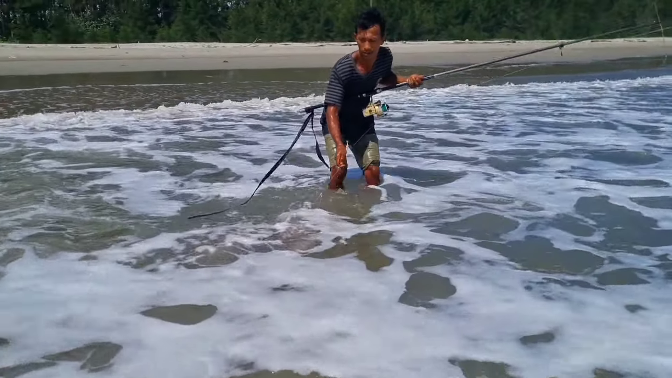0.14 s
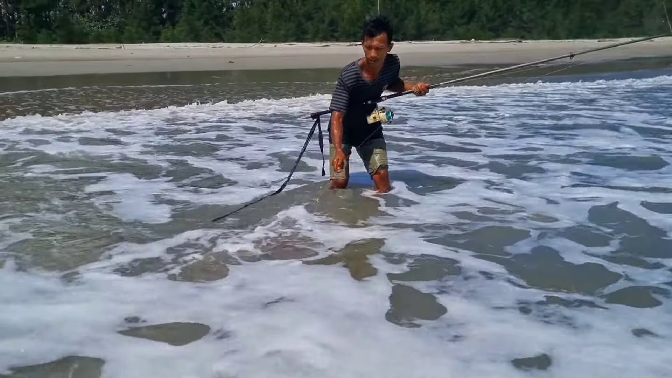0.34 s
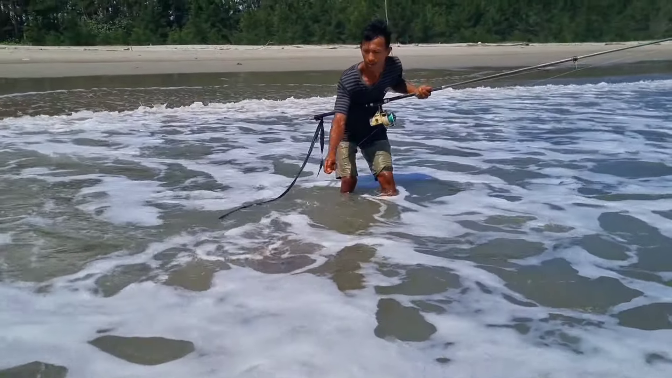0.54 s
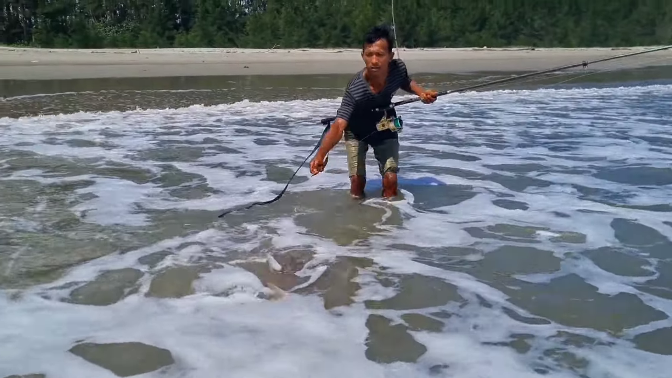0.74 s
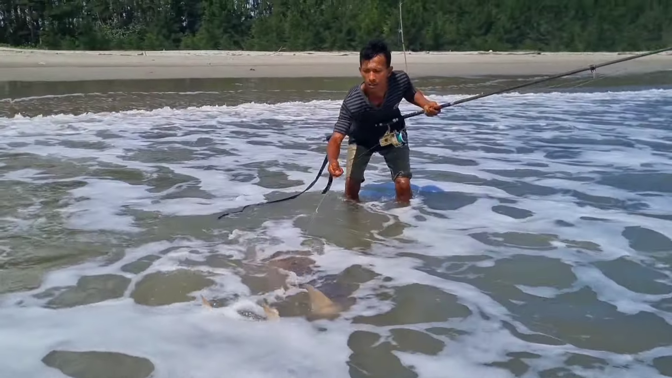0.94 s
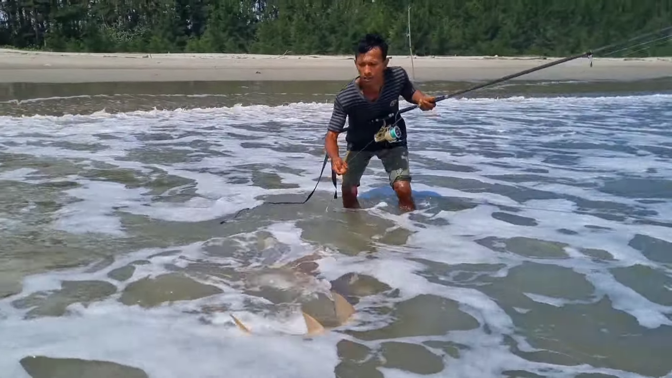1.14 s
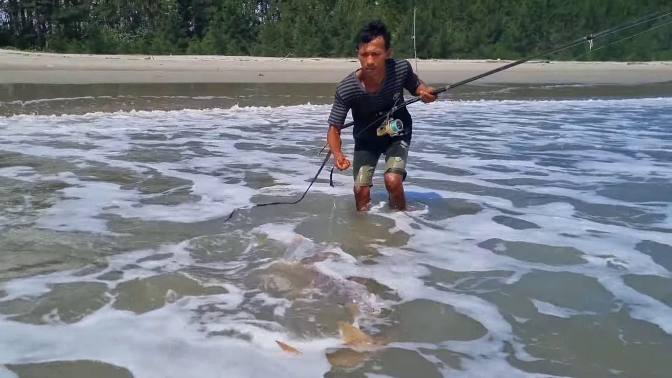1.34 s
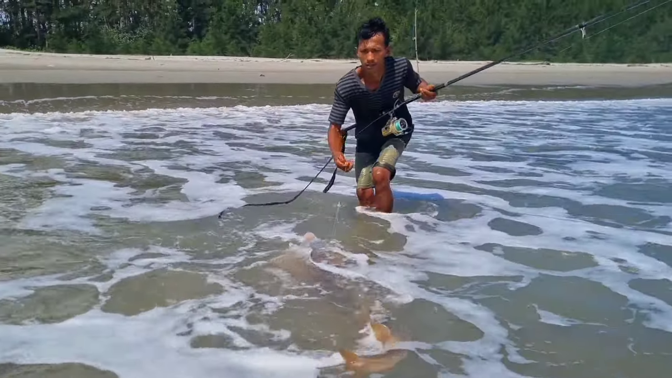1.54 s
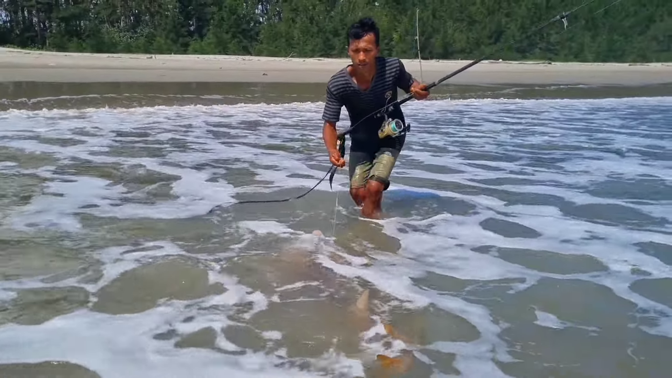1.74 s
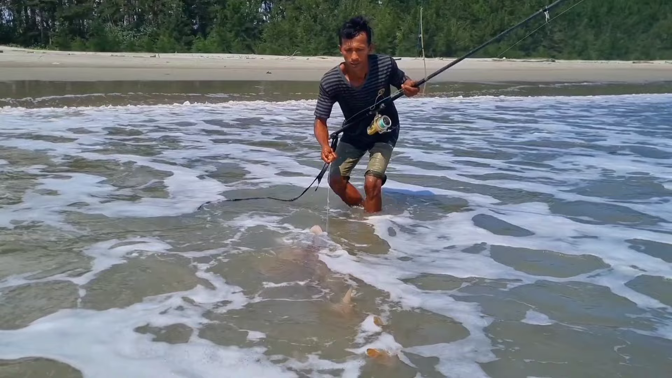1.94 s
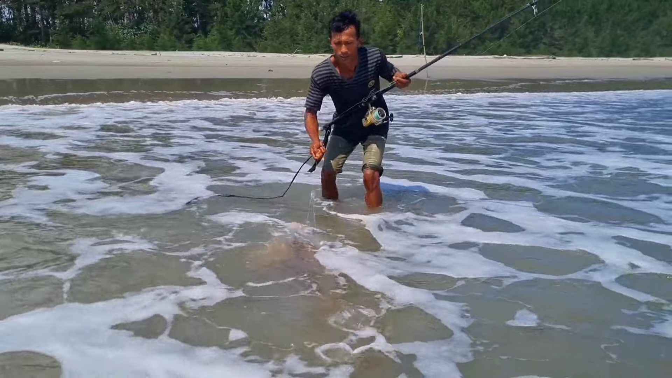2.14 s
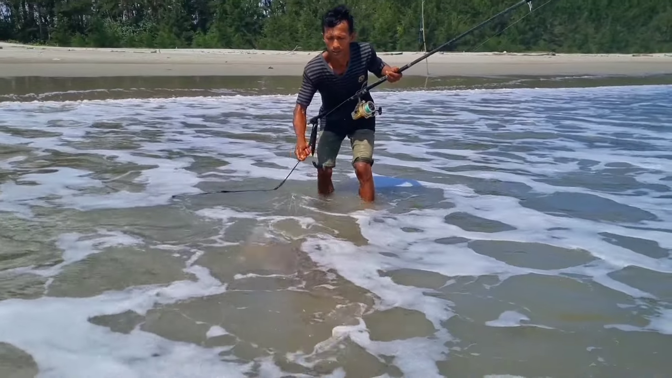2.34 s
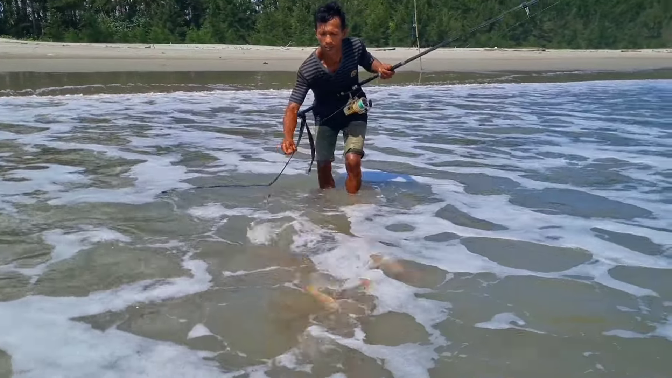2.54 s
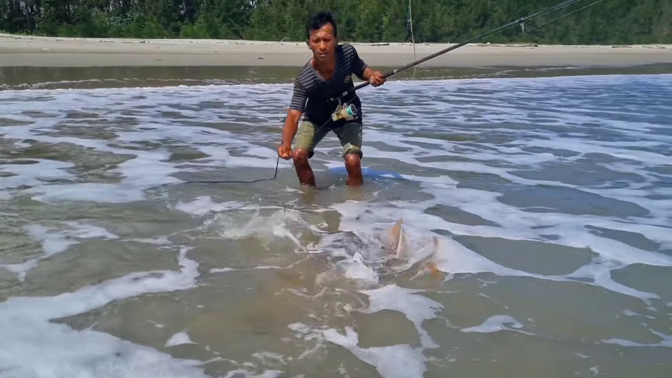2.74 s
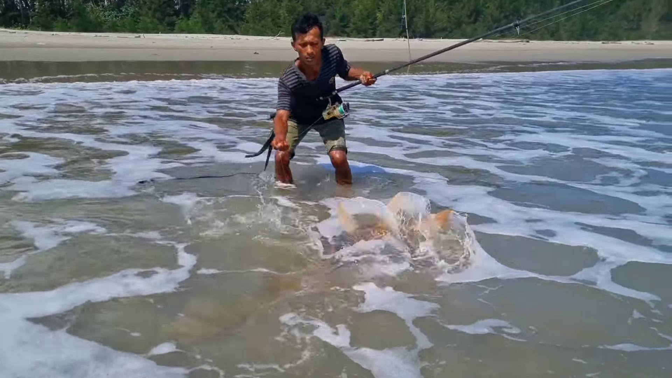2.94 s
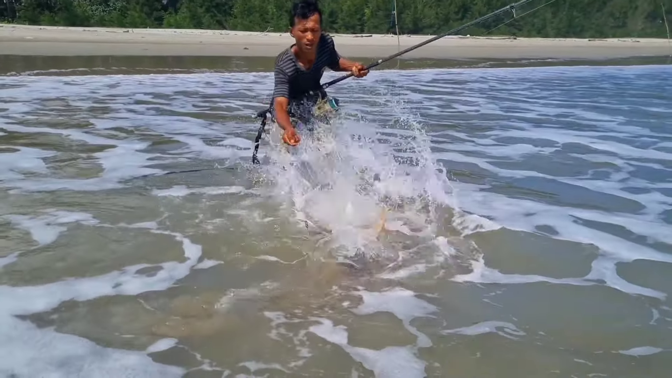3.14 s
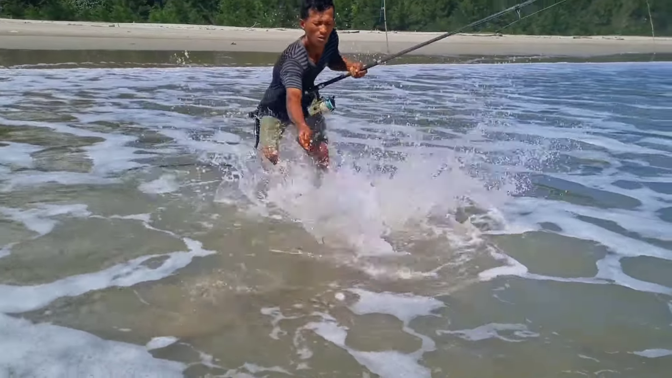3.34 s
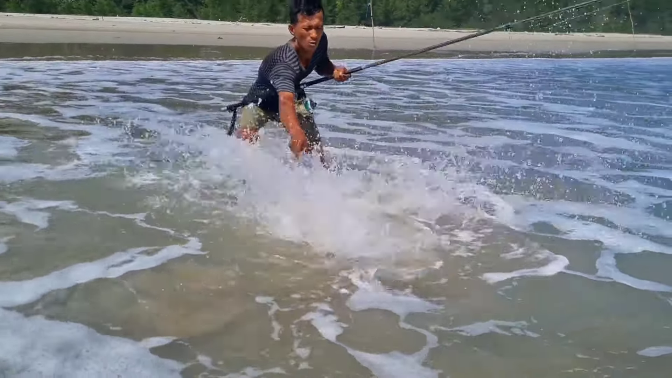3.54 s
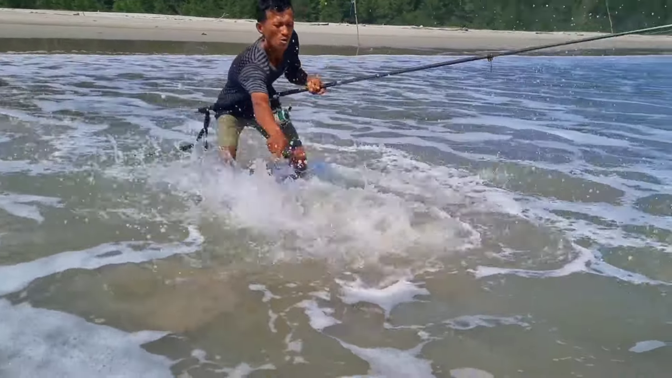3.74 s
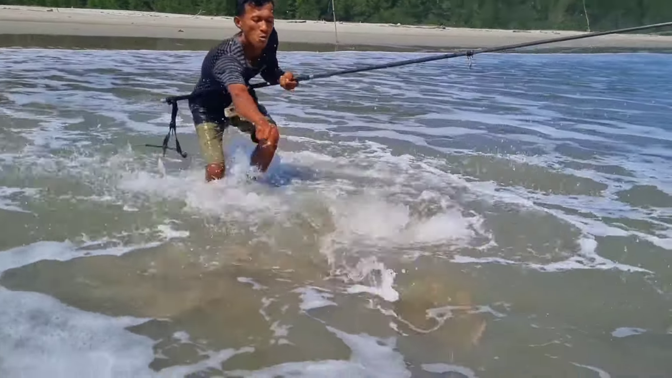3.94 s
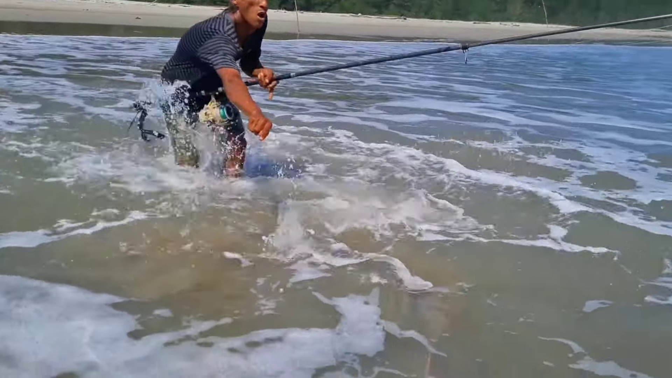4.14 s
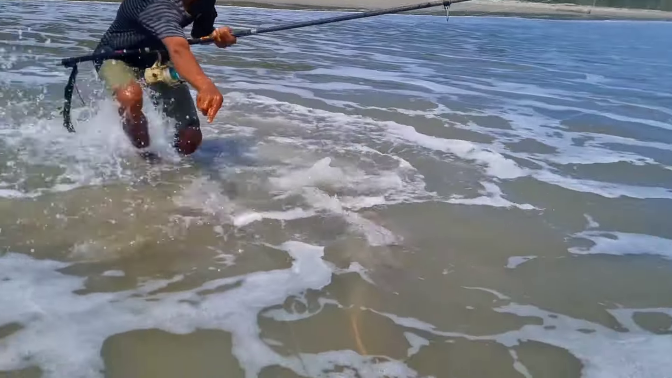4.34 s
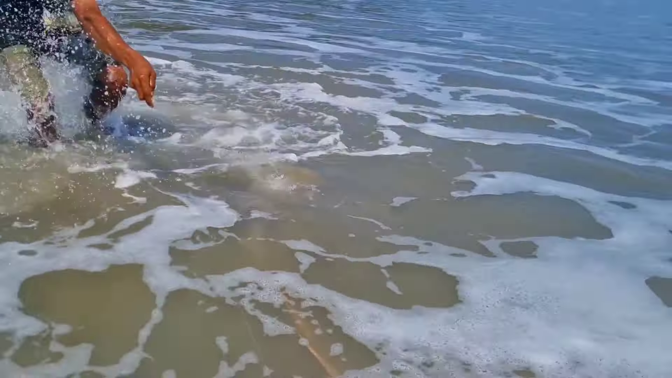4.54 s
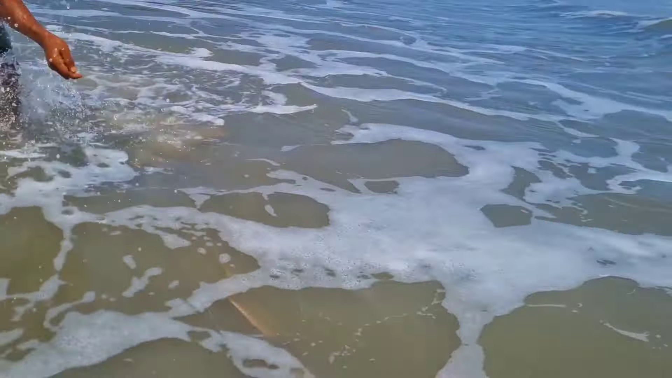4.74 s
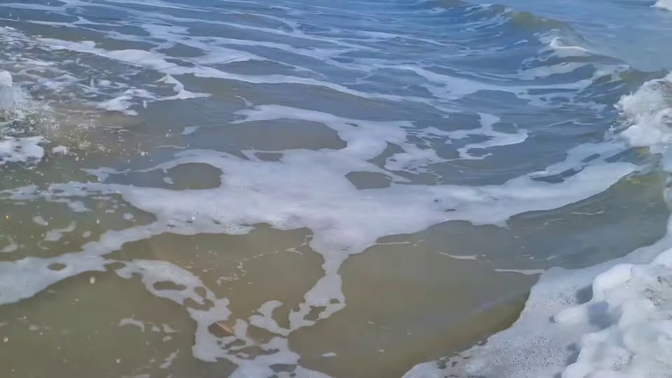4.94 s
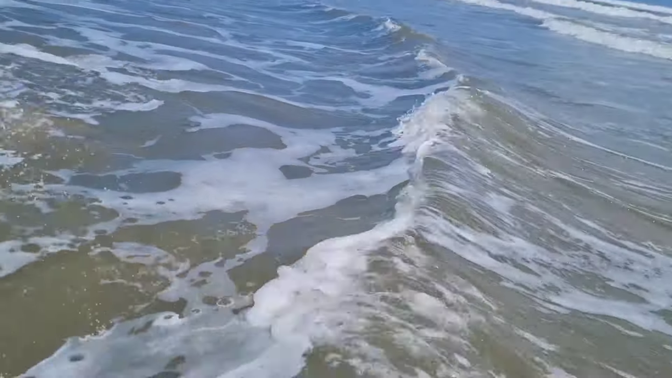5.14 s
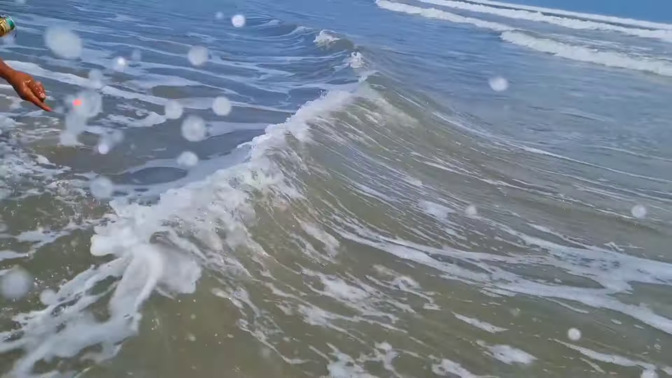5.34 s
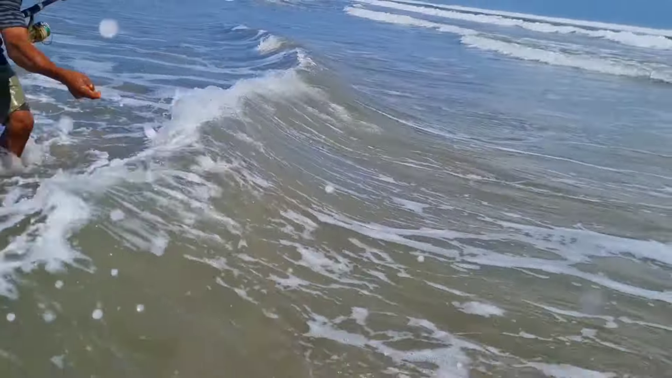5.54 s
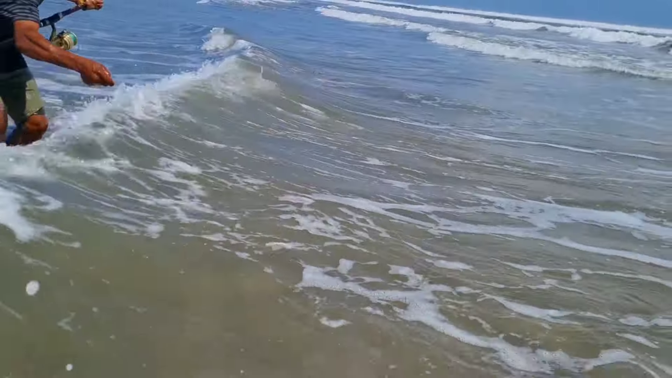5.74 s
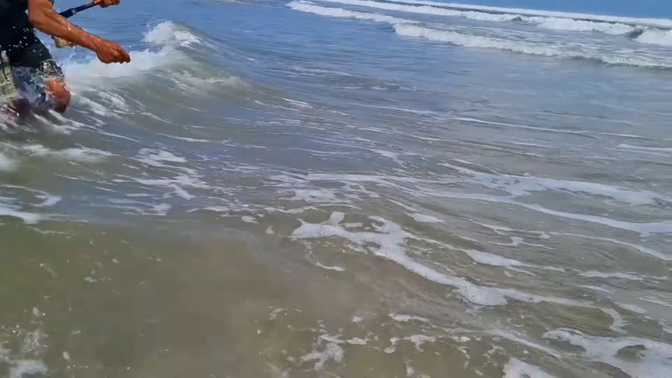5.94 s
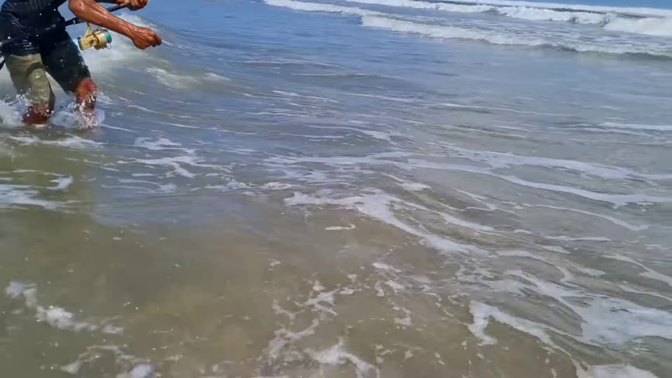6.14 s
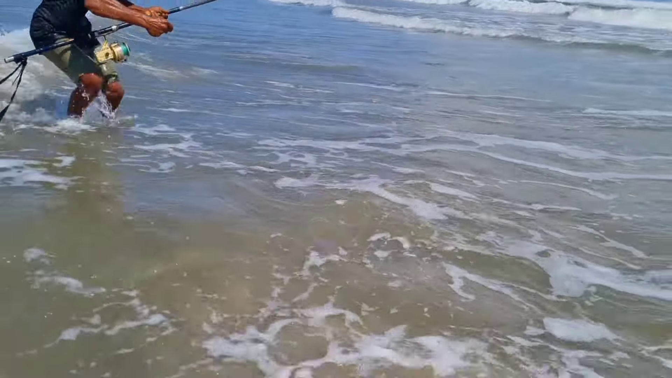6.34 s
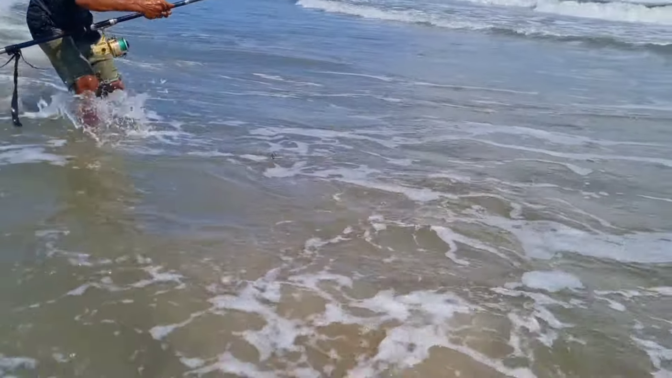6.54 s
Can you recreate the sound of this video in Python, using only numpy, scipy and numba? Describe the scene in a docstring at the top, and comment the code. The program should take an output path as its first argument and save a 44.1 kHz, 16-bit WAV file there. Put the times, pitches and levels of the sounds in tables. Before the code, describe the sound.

Distant breakers roar steadily off a beach while foam fizzes and shallow water laps and plops close by. Wind rumbles and thumps on the microphone. About halfway through, something thrashes in the shallows, throwing up splashes and pattering spray. The wind then eases as a small wave slops past and a person wades nearby, with gurgling, gulping splashes and a brighter hiss of foam.

```python
"""A sandy beach, knee-deep in the wash: breakers roar out to sea, foam fizzes, wind bumps the microphone.
From three seconds on something thrashes in the shallows, legs wade past and a small wave slops close by.
The near water sounds by bubble resonance: trapped air is a spring and the water around it a mass,
so big bubbles gulp, small ones patter and the tiniest fizz. Surf and wind are turbulent, broadband noise.
Levels in the tables are relative within a layer; scene() sets the balance between layers."""
import sys
import numpy as np
from scipy import signal
from scipy.fft import rfft, irfft, next_fast_len
from scipy.io import wavfile
from scipy.ndimage import map_coordinates
from numba import njit

SR = 44100
rng = np.random.default_rng(int(sys.argv[2]) if len(sys.argv) > 2 else 0)


def master_out(mix):
    """Clip the mix to full scale and print it as 16-bit PCM to the path in sys.argv[1]."""
    frames = np.transpose(np.atleast_2d(mix))
    ceiling = np.clip(frames, -1, 1)
    pcm = np.round(ceiling * 32767).astype(np.int16)
    wavfile.write(sys.argv[1], SR, pcm)


N = 294625
TIME = np.arange(N) / SR
WADER_BEARING = -0.11   # -1 left .. 1 right


def from_db(db):
    """Decibel scale: 20 dB is a tenfold amplitude."""
    return 10 ** (np.asarray(db) / 20)


def added_db(*levels_db):
    """Incoherent addition: unrelated sounds sum in power."""
    return 10 * np.log10(sum(from_db(level) ** 2 for level in levels_db))


def rms_one(x):
    """Normalisation to unit mean power."""
    return x / np.sqrt(np.mean(x ** 2) + 1e-20)


def in_time(rows):
    """Linear interpolation of (time_s, value) rows at every sample."""
    return np.interp(TIME, *np.transpose(rows))


def drift(rate_hz):
    """Random modulation: low-passed noise of unit spread, changing about rate_hz times a second."""
    step, settle = 40, 2000
    pole = np.exp(-2 * np.pi * step * rate_hz / SR)
    noise = rng.standard_normal(N // step + settle + 2)
    slow = signal.lfilter([1], [1, -2 * pole, pole * pole], noise)[settle:]
    return np.interp(np.arange(N) / step, np.arange(len(slow)), rms_one(slow))


def coloured(x, spectrum):
    """Spectral shaping: a white sound takes on a smooth spectrum, at unit power."""
    size = next_fast_len(N)
    hz, db = np.transpose(spectrum)
    freqs = np.maximum(np.fft.rfftfreq(size, 1 / SR), 1)
    gain = from_db(np.interp(np.log(freqs), np.log(hz), db))
    skirts = np.minimum(freqs / hz[0], 1) * np.minimum(hz[-1] / freqs, 1)
    return rms_one(irfft(rfft(x, size) * gain * skirts, size)[..., :N])


def swells(crests_s, peaks_db, rise_s, falls_s):
    """Growth and decay: the level in dB of swells with a Gaussian rise and an exponential fall."""
    power = np.full(N, 1e-12)
    for crest_s, peak_db, fall_s in np.broadcast(crests_s, peaks_db, falls_s):
        age = TIME - crest_s
        fade = np.where(age < 0, (age / rise_s) ** 2, age / fall_s)
        power += from_db(peak_db) ** 2 * np.exp(-2 * np.minimum(fade, 20))
    return 10 * np.log10(power)


@njit
def damped_sines(starts_s, heights, pitches_hz, decays_s, rise):
    """Damped oscillation: dying sines whose pitch climbs by `rise`, as a bubble's does near the surface."""
    out = np.zeros(N)
    for k in range(len(starts_s)):
        first = max(int(starts_s[k] * SR) + 1, 0)
        for i in range(first, min(first + int(6 * decays_s[k] * SR), N)):
            t = i / SR - starts_s[k]
            age, turns = t / decays_s[k], t * pitches_hz[k]
            envelope = heights[k] * (1 - np.exp(-4 * turns)) * np.exp(-age)
            out[i] += envelope * np.sin(2 * np.pi * turns * (1 + rise * age))
    return out


def bubbles(starts_s, heights, pitches_hz, cycles, rise, bearing):
    """Arrival-time difference: each bubble reaches the nearer microphone port a little earlier."""
    port_lag_s = 0.00045
    shift_s = bearing * port_lag_s / 2
    return np.array([damped_sines(starts_s + side * shift_s, heights, pitches_hz, cycles / pitches_hz, rise)
                     for side in (1, -1)])


def bubble_cloud(low_hz, high_hz, cycles, spread_db, cluster_db, rise, width, count):
    """Superposition: random bubbles, louder in clusters of like size, give about equal power per Hz."""
    when, size, strength, damping, place, sign = rng.random((count, 6)).T
    pitches_hz = (np.sqrt(low_hz) + size * (np.sqrt(high_hz) - np.sqrt(low_hz))) ** 2
    clusters = map_coordinates(rng.standard_normal((201, 10)), [when * 200, size * 9], order=1)
    level_db = spread_db * np.minimum(-np.log(1 - strength), 4) + cluster_db * clusters
    heights = from_db(level_db) * np.sign(sign - .5) * pitches_hz ** (3 / 4)
    bearing = WADER_BEARING + width * (2 * place - 1)
    return bubbles(when * N / SR, heights, pitches_hz, cycles * (.5 + damping), rise, bearing)


# Distant surf: time_s, level_db
SURF_LEVEL = [(0, -34.5), (.25, -38.5), (.7, -34.5), (.95, -33), (1.2, -34), (1.6, -35.5), (2.1, -34.5),
              (2.4, -32), (2.7, -32), (3.3, -31.5), (4.2, -33), (6.68, -32)]
# Delay of the left channel as the microphone turns to face the sea: time_s, lag_ms
SURF_LAG = [(0, 0.4), (4.1, 0.45), (4.9, 0.23), (6.68, 0.25)]
# Spectrum of the surf: frequency_hz, density_db
SURF_SPECTRUM = [(70, -12.5), (125, -4.5), (190, -12), (250, 0.5), (340, 2), (500, -2), (750, -8),
                 (1150, -19), (1700, -28.5), (2200, -27.5), (3200, -37.5), (5000, -39.5)]


def breakers(diffuse_db, flutter_db):
    """Direct and diffuse fields: a dull roar from one side, a weaker one from the whole shoreline."""
    roar = coloured(rng.standard_normal(N), SURF_SPECTRUM)
    delayed = np.interp(TIME - in_time(SURF_LAG) / 1000, TIME, roar)
    diffuse = coloured(rng.standard_normal((2, N)), SURF_SPECTRUM)
    field = rms_one(np.array([delayed, roar]) + from_db(diffuse_db) * diffuse)
    return from_db(in_time(SURF_LEVEL) + flutter_db * drift(26)) * field


# Steady breeze on the microphone: time_s, level_db
BREEZE_LEVEL = [(0, -46), (1.1, -37.5), (2.3, -35.5), (4.4, -39), (5.3, -35), (5.8, -39.5), (6.68, -43)]
# Gusts on top of it: crest_s, peak_db
WIND_GUSTS = [(.39, -36), (.61, -32.5), (1.0, -36.5), (1.85, -32.5), (2.04, -35), (2.44, -30.5),
              (2.99, -31), (3.35, -34), (3.69, -33), (4.06, -34.5), (4.43, -49), (6.24, -41)]
# Spectrum of the eddies: frequency_hz, density_db
WIND_SPECTRUM = [(15, -18), (28, -12), (45, -4), (66, 2), (95, -3), (135, 0), (190, -4), (300, -4.5),
                 (600, -21.5), (2000, -61)]


def wind(lump_db, shared):
    """Turbulent pressure: eddies press on each port mostly independently, harder in the gusts."""
    crests_s, peaks_db = np.transpose(WIND_GUSTS)
    gusts_db = swells(crests_s, peaks_db, rise_s=0.039, falls_s=0.09)
    level_db = added_db(in_time(BREEZE_LEVEL), gusts_db)
    eddies = coloured(rng.standard_normal((2, N)) + shared * rng.standard_normal(N), WIND_SPECTRUM)
    return from_db(level_db + lump_db * np.array([drift(18), drift(24)])) * eddies


# Single eddies striking the microphone: start_s, peak_db, pitch_hz
EDDY_THUMPS = [(0.63, -21, 69.6), (0.671, -23, 65), (1.818, -26, 110), (1.905, -28, 65), (1.995, -17, 80),
               (2.03, -15, 130), (2.074, -23, 100), (2.245, -15, 110), (2.54, -15, 94), (2.696, -19, 135),
               (2.808, -17.5, 130), (2.985, -15, 112), (3.198, -18, 100), (3.344, -16.5, 75),
               (3.441, -13.5, 71.5), (3.702, -8.5, 153), (3.963, -12.5, 115), (4.052, -24, 90),
               (4.18, -31, 100), (4.335, -17, 95), (4.525, -17, 101)]


def thumps(cycles):
    """Pressure pulse: a big eddy gives a short, low push and pull, unequal at the two ports."""
    start_s, peak_db, pitch_hz = np.transpose(EDDY_THUMPS)
    ports = []
    for _ in range(2):
        arrival_s = start_s + rng.uniform(-0.0015, 0.00047, len(start_s))
        heights = from_db(peak_db + rng.normal(0, 1.1, len(start_s)))
        ports.append(damped_sines(arrival_s, heights, pitch_hz, cycles / pitch_hz, rise=0.))
    return np.array(ports)


# How hard the near water is stirred: time_s, level_db
CHURN_LEVEL = [(0.0, -48), (0.56, -48), (1.65, -58), (2.1, -54), (3.63, -35.5), (4.07, -38.5), (4.67, -35),
               (4.82, -33), (5.38, -34.5), (5.84, -34), (6.51, -37), (6.68, -35)]
# Fizz of the foam lying around: time_s, level_db
FOAM_LEVEL = [(0, -52.5), (.33, -48.5), (.9, -48.5), (1.4, -50.5), (1.55, -50), (1.62, -56.5), (1.8, -56.5),
              (2.05, -53.5), (2.7, -49.5), (3.1, -49.5), (3.92, -47), (4.06, -50.5), (4.54, -49),
              (4.64, -45), (5.1, -42.5), (5.38, -45), (5.78, -41), (6.06, -45.5), (6.68, -45.5)]
# A body or a wavelet heaves the water up: crest_s, fall_s, slosh_db, patter_db
WATER_SURGES = [(.31, 0.22, -57, -46.5), (.71, 0.033, -55, -44), (2.63, 0.25, -52, -43.5),
                (2.98, 0.34, -30, -57), (3.125, 0.057, -29.5, -38.5), (3.32, 0.11, -32, -38.5),
                (3.435, 0.035, -49, -41), (3.645, 0.18, -24, -49), (4.13, 0.052, -44, -42),
                (4.47, 0.052, -48, -40.5), (4.68, 0.076, -25, -40), (4.81, 0.25, -28, -52),
                (5.1, 0.076, -23, -37.5), (5.255, 0.037, -27, -54), (5.535, 0.065, -25, -58),
                (5.595, 0.044, -25, -31), (5.84, 0.13, -37, -45), (6.15, 0.041, -20, -41),
                (6.21, 0.16, -42, -37), (6.49, 0.078, -21, -36.5)]


def water_levels(full_churn_db, surge_rise_s):
    """Air entrainment: churn and surges drive bubbles of every size, setting four layers' levels in dB."""
    crests_s, falls_s, slosh_peaks_db, patter_peaks_db = np.transpose(WATER_SURGES)
    heave_db = swells(crests_s, slosh_peaks_db, surge_rise_s, falls_s)
    drops_db = swells(crests_s, patter_peaks_db, surge_rise_s, falls_s)
    churn_db = in_time(CHURN_LEVEL) - full_churn_db
    foam_db = in_time(FOAM_LEVEL)
    slosh_db = added_db(1.43 * churn_db - 29.5, heave_db)
    gurgle_db = added_db(1.88 * churn_db - 33, (heave_db + drops_db) / 2 - 3)
    patter_db = added_db(1.85 * churn_db - 37.5, drops_db, foam_db - 3)   # bursting foam patters too
    fizz_db = added_db(foam_db, drops_db - 11)   # a surge whips up foam
    return slosh_db, gurgle_db, patter_db, fizz_db


# Spectrum of the foam: frequency_hz, density_db
FOAM_SPECTRUM = [(500, 3), (1500, 3), (2500, 3.5), (4000, 2), (6000, -0.5), (8700, -1.5), (12000, -0.2),
                 (15500, -2.5)]


def foam(level_db, pop_db):
    """Film rupture: countless tiny cells burst all around, merging into a hiss with sharper pops in it."""
    pops = bubble_cloud(low_hz=1536, high_hz=15540, cycles=8.2, spread_db=0.5, cluster_db=4.0,
                        rise=0.0363, width=1.0, count=30000)
    fizz = rng.standard_normal((2, N)) + from_db(pop_db) * rms_one(pops)
    return from_db(level_db) * coloured(fizz, FOAM_SPECTRUM)


# Spectrum of the droplets: frequency_hz, density_db
PATTER_SPECTRUM = [(500, -6), (1100, -1.5), (1700, 1), (2500, -4), (3500, -9), (5000, -13.5), (9000, -20.5),
                   (16000, -38)]


def pattering(level_db, ring_db):
    """Drop impact: droplets patter over the stirred surface; a few leave a bubble that tinkles on."""
    dull = bubble_cloud(low_hz=679, high_hz=10250, cycles=3.1, spread_db=-1.5, cluster_db=-0.5,
                        rise=0.0066, width=0.41, count=22000)
    ringing = bubble_cloud(low_hz=1081.6, high_hz=8067, cycles=24.8, spread_db=1.5, cluster_db=2.0,
                           rise=0.015, width=0.23, count=2400)
    cloud = rms_one(dull) + from_db(ring_db) * rms_one(ringing)
    return from_db(level_db) * coloured(cloud, PATTER_SPECTRUM)


# Spectrum of the middle-sized bubbles: frequency_hz, density_db
GURGLE_SPECTRUM = [(200, -33), (400, -2), (600, 2), (850, 2.2), (1250, -1.5), (1700, -9), (2500, -35),
                   (5000, -34)]


def gurgling(level_db, ring_db):
    """Damped resonance: stirred water folds air under; most bubbles die fast and a few ring out."""
    damped = bubble_cloud(low_hz=295.4, high_hz=3466, cycles=4.6, spread_db=2.5, cluster_db=2.0,
                          rise=0.031, width=0.74, count=9000)
    ringing = bubble_cloud(low_hz=385, high_hz=2178, cycles=8.7, spread_db=3.0, cluster_db=3.5,
                           rise=0.027, width=0.39, count=1100)
    cloud = rms_one(damped) + from_db(ring_db) * rms_one(ringing)
    return from_db(level_db) * coloured(cloud, GURGLE_SPECTRUM)


# Spectrum of the big air pockets: frequency_hz, density_db
SLOSH_SPECTRUM = [(110, -15), (180, -12.5), (240, -3), (350, -3), (500, -6.5), (750, -21), (1500, -49)]


def sloshing(level_db):
    """Resonant pitch falls with size: water slapping over itself traps big pockets of air that glug."""
    cloud = bubble_cloud(low_hz=176.2, high_hz=812, cycles=4.1, spread_db=0.8, cluster_db=3.5,
                         rise=0.013, width=0.78, count=2600)
    return from_db(level_db) * coloured(cloud, SLOSH_SPECTRUM)


# Blobs of falling water: start_s, peak_db, typical_pitch_hz, pitch_spread_octaves, typical_length_s
FALLING_BLOBS = [(.181, -28, 8650, 0.84, 0.016), (.238, -35, 1460, .15, 0.013),
                 (.285, -43, 2300, 0.27, 0.043), (.69, -32, 1790, 0.12, 0.024),
                 (.726, -25.5, 5300, .45, 0.013), (.72, -31, 3000, 0.7, 0.042),
                 (.922, -35, 3400, 0.12, .01), (2.628, -30, 1330, 0.29, 0.034),
                 (3.108, -20, 1490, 0.57, 0.043), (3.112, -26, 6500, 0.71, .03),
                 (3.147, -26.5, 5630, 0.69, 0.054), (3.308, -25, 2200, 0.78, 0.016),
                 (3.309, -34, 6000, 1.1, .025), (3.355, -31, 1250, 0.27, 0.032),
                 (3.39, -31, 2500, .6, 0.033), (3.428, -25, 2600, 0.37, .03), (3.478, -36, 8040, .7, 0.013),
                 (3.486, -25, 2830, 0.29, .018), (3.583, -31, 2100, .8, .016),
                 (3.642, -28.5, 2700, .5, 0.023), (3.9, -24.5, 5140, 1.2, 0.024),
                 (4.093, -25.5, 2390, 0.33, .02), (4.128, -34, 4300, 0.5, .015),
                 (4.172, -26, 2100, 0.55, 0.033), (4.246, -30, 3260, 0.55, .03),
                 (4.308, -23, 960, 0.38, .035), (4.349, -26, 2270, 1.57, .012),
                 (4.445, -34, 4900, .5, 0.021), (4.517, -33, 2850, .12, 0.013),
                 (4.855, -14, 896, 0.24, 0.011), (4.942, -25.5, 3470, 0.43, .012),
                 (5.262, -20, 1060, 0.27, 0.02), (5.492, -25, 1320, 0.21, .015),
                 (5.59, -22, 3700, 0.97, 0.034), (5.83, -29, 2300, 0.88, 0.032),
                 (6.198, -19, 2000, 1.14, 0.014), (6.277, -21.5, 7100, 0.38, .007)]


def splatters(fade_db, cycles, rise, count):
    """Break-up into drops: a blob lands as a run of ever weaker drops, each leaving a bubble."""
    start_s, peak_db, pitch_hz, octaves, length_s = np.repeat(FALLING_BLOBS, count, axis=0).T
    progress = np.tile(np.arange(count), len(FALLING_BLOBS)) / count
    jitter, detune, place = rng.uniform(-1.1, 1, (len(start_s), 3)).T
    landings_s = start_s + length_s * progress * (1 + jitter / 2)
    heights = from_db(peak_db - fade_db * progress)
    pitches_hz = pitch_hz * 2 ** (octaves * detune)
    return bubbles(landings_s, heights, pitches_hz, cycles, rise, WADER_BEARING + 0.12 * place)


# Single drops that plop or plink: start_s, peak_db, pitch_hz
FAT_DROPS = [(.369, -25, 1700), (.591, -38, 1050), (.674, -33, 2300), (.796, -34, 2750), (.845, -37, 2200),
             (.911, -28, 835), (1.731, -30, 790), (2.474, -29, 760), (2.630, -37, 1320),
             (2.957, -20.5, 1150), (2.961, -27, 1390), (3.150, -25, 1035), (3.378, -21, 860),
             (4.096, -27, 1040), (4.689, -19, 930), (4.800, -21, 1930), (4.841, -25, 1890),
             (4.915, -26, 5000), (6.053, -26, 2170), (6.187, -25, 4600), (6.536, -25, 4450),
             (6.622, -21, 784)]


def plops(cycles, rise):
    """Impulse excitation: a fat drop pulls one bubble under, which rings clearly from a sharp start."""
    start_s, peak_db, pitch_hz = np.transpose(FAT_DROPS)
    bearing = WADER_BEARING + rng.uniform(-.15, .15, len(start_s))
    return bubbles(start_s, from_db(peak_db), pitch_hz, cycles, rise, bearing)


# Splashes, each with a trapped air pocket and spray: start_s, peak_db, pitch_hz, spray_db
NEAR_SPLASHES = [(0.085, -26, 366, -39), (0.32, -16.5, 420, -43), (0.381, -15, 270, -41),
                 (0.562, -14.5, 310, -37), (0.726, -10.5, 310, -54), (.742, -17, 570, -53),
                 (.866, -14.5, 292, -52), (1.006, -13, 314, -48), (1.142, -14.5, 446, -52),
                 (1.424, -22, 350, -56), (1.928, -12.5, 264, -49), (1.971, -19, 337, -58),
                 (2.193, -11, 410, -47), (2.306, -12.5, 403, -46), (2.472, -23, 597, -56),
                 (2.810, -18.5, 300, -52), (2.925, -11.5, 271, -50), (3.105, -24, 560, -35),
                 (3.116, -7, 484, -31), (3.13, -20, 560, -30), (3.165, -29, 674, -43),
                 (3.308, -9.5, 422, -27.5), (3.446, -13.5, 380, -45), (3.496, -13, 480, -38),
                 (3.644, -0.5, 505, -26), (3.671, -9, 444, -44), (3.701, -12, 400, -34),
                 (3.958, -11.5, 290, -53), (4.306, -12.5, 360, -32), (4.523, -7.5, 300, -34),
                 (4.798, -4, 274, -39), (4.855, -6.5, 800, -28), (4.874, -3.5, 384, -41),
                 (5.066, -9.5, 285, -44), (5.076, -5, 430, -30), (5.096, -6.5, 494, -28.5),
                 (5.126, -10, 330, -34), (5.227, -7.5, 317, -43), (5.248, -4.5, 288, -30),
                 (5.449, -9, 253, -49), (5.525, -6.5, 294, -24), (5.538, -7.5, 426, -36),
                 (5.570, -9, 366, -42), (5.656, -10, 410, -40), (5.81, -7, 266, -24.5),
                 (5.829, -9.5, 246, -25), (5.839, -1, 272, -46), (6.013, -8.5, 333, -50),
                 (6.106, -8.5, 364, -28), (6.163, -10.5, 635, -35), (6.201, -12, 417, -29),
                 (6.472, -4, 370, -35), (6.498, -5, 352, -28)]


def gulps(cycles, rise, low_cut_hz):
    """Cavity resonance: each splash closes over an air pocket that rings briefly, with no deep bass."""
    start_s, peak_db, pitch_hz, _ = np.transpose(NEAR_SPLASHES)
    bearing = WADER_BEARING + rng.uniform(-.2, .2, len(start_s))
    rings = bubbles(start_s, from_db(peak_db), pitch_hz, cycles, rise, bearing)
    return signal.sosfilt(signal.butter(2, low_cut_hz, "high", fs=SR, output="sos"), rings)


def spray(attack_s, decay_s):
    """Broadband transient: each splash also throws up a short burst of heavily damped bubbles."""
    power = np.zeros(N)
    for start_s, _, _, spray_db in NEAR_SPLASHES:
        first = max(int((start_s - attack_s / 2) * SR), 0)
        age = TIME[:N - first]
        envelope = np.minimum(age / attack_s, 1) * np.exp(-np.minimum(age / decay_s, 20))
        power[first:] += (from_db(spray_db) * envelope) ** 2
    cloud = bubble_cloud(low_hz=192, high_hz=12400, cycles=1.67, spread_db=1.0, cluster_db=8.0,
                         rise=0.032, width=0.4, count=32000)
    return np.sqrt(power) * spray_timbre(cloud)


# Spectrum of the spray: frequency_hz, density_db
SPRAY_SPECTRUM = [(110, -13), (190, 13), (280, -11.5), (550, 4), (1100, -3), (2200, -9.5), (4000, -21.5),
                  (8000, -21.5), (16000, -25)]


def spray_timbre(cloud):
    """Spectral envelope: the spray has two low peaks and a treble that falls away."""
    return coloured(cloud, SPRAY_SPECTRUM)


def scene():
    """Superposition of far breakers, stirred water and its foam, splashes and wind on the microphone."""
    slosh_db, gurgle_db, patter_db, fizz_db = water_levels(full_churn_db=-33, surge_rise_s=0.044)
    ripple_db = drift(13.6)   # each ripple stirs droplets and foam together
    sea = from_db(4.0) * breakers(diffuse_db=-6.0, flutter_db=1.67)
    near = from_db(-1.5) * sloshing(slosh_db)
    near += from_db(3.5) * gurgling(gurgle_db, ring_db=-3.5)
    surface = from_db(2.0) * pattering(patter_db + 0.75 * ripple_db, ring_db=-2.5)
    surface += from_db(6.5) * foam(fizz_db + 1.22 * ripple_db, pop_db=-8.0)
    near += from_db(-3.5) * gulps(cycles=2.14, rise=0.0081, low_cut_hz=149)
    near += from_db(-0.5) * spray(attack_s=0.0056, decay_s=0.042)
    near += from_db(-4.5) * splatters(fade_db=12.5, cycles=4.5, rise=0.011, count=26)
    near += from_db(-0.5) * plops(cycles=4.4, rise=0.012)
    near *= from_db([[-.4], [.4]])   # a little louder on the right
    air = from_db(1.5) * wind(lump_db=4.0, shared=0.48) + from_db(-0.9) * thumps(cycles=0.98)
    return sea + near + surface + air


def record(dry):
    """Band limiting: a steep low-pass filter removes the highest treble."""
    cutoff_hz = 15600
    return signal.sosfilt(signal.ellip(12, .1, 80, cutoff_hz, fs=SR, output="sos"), dry)


dry = scene()
out = record(dry)
master_out(out)
```